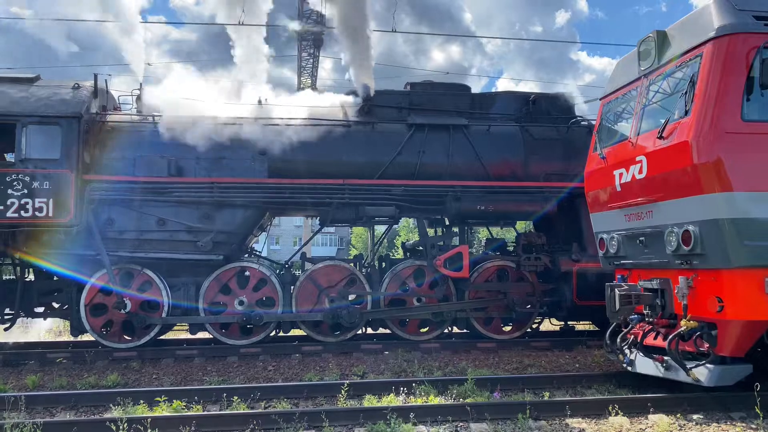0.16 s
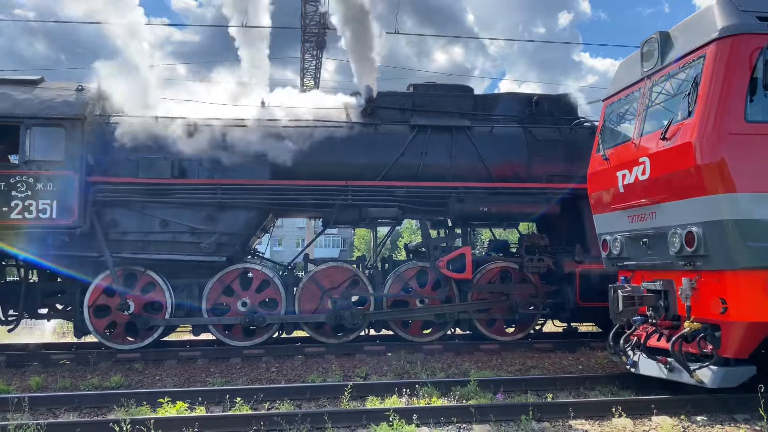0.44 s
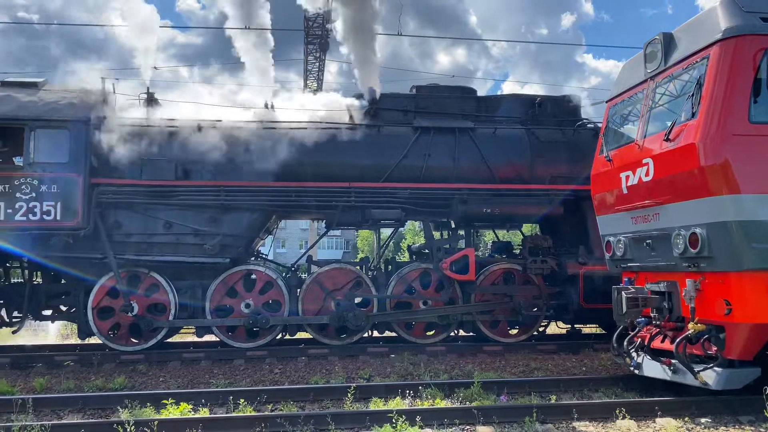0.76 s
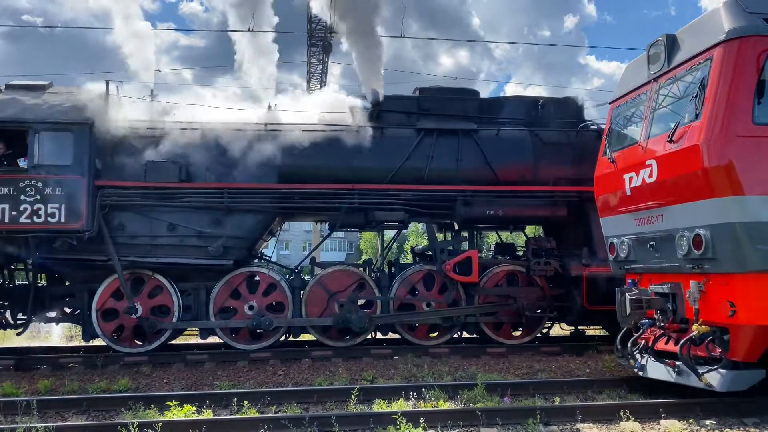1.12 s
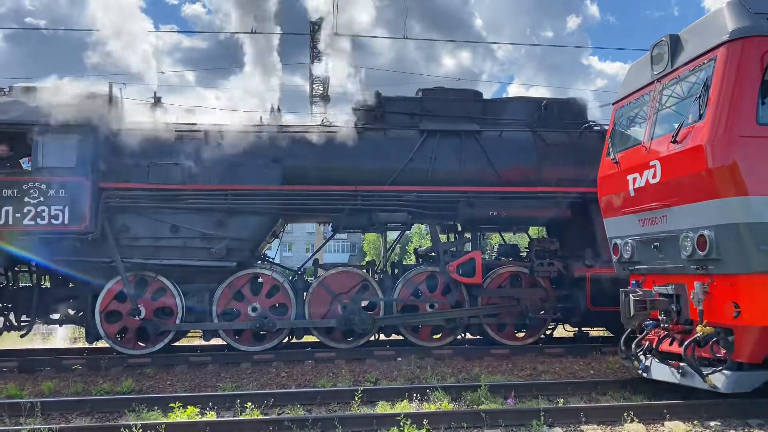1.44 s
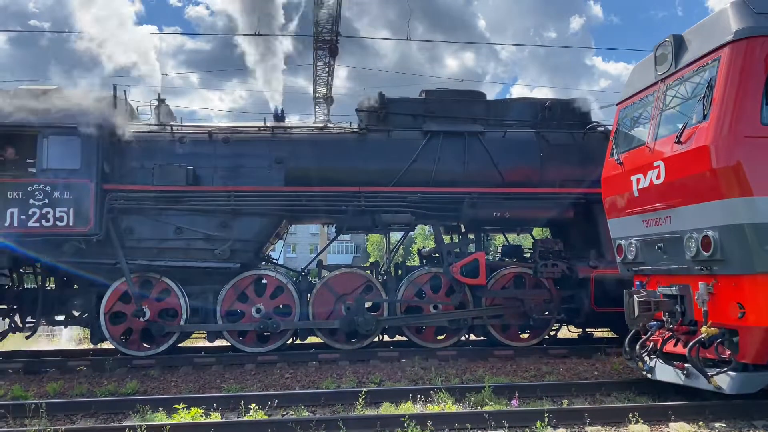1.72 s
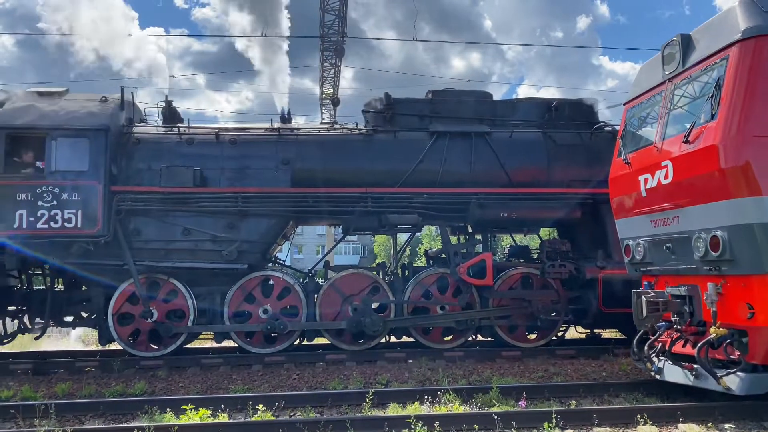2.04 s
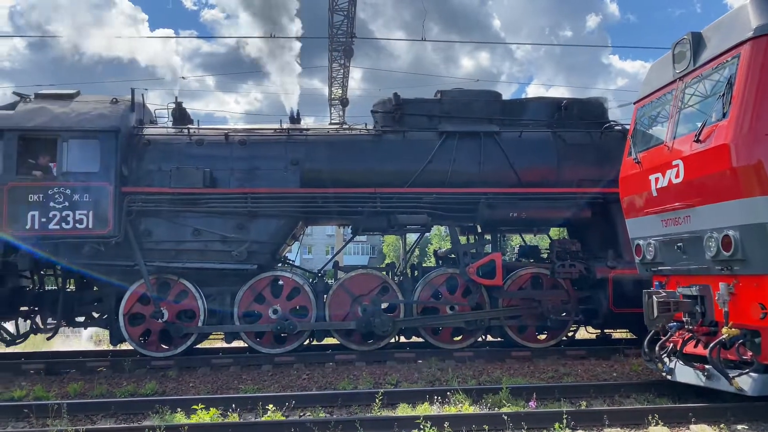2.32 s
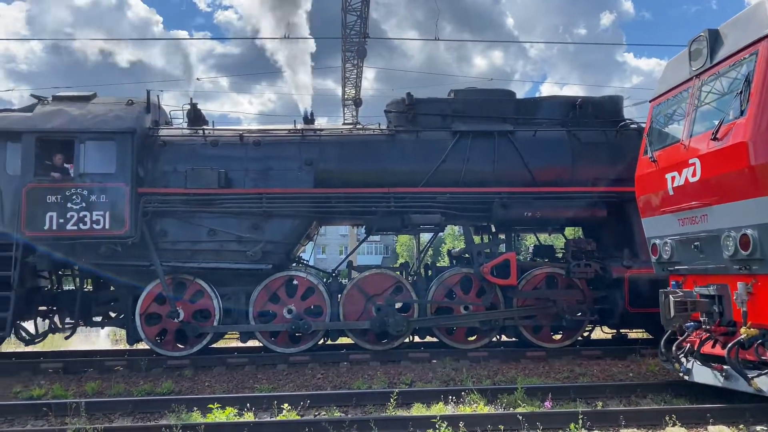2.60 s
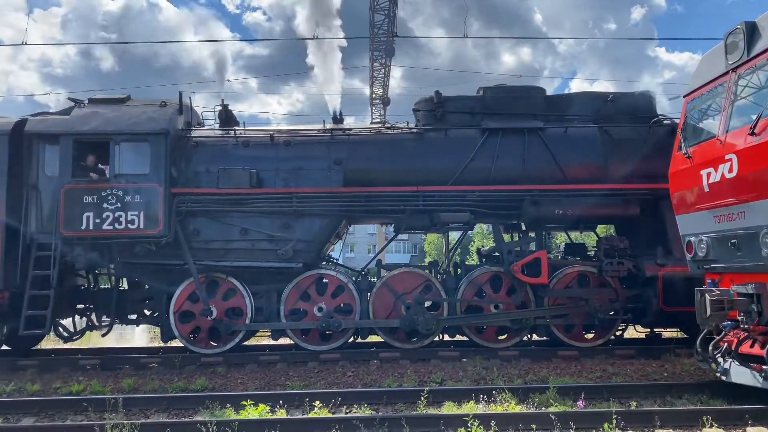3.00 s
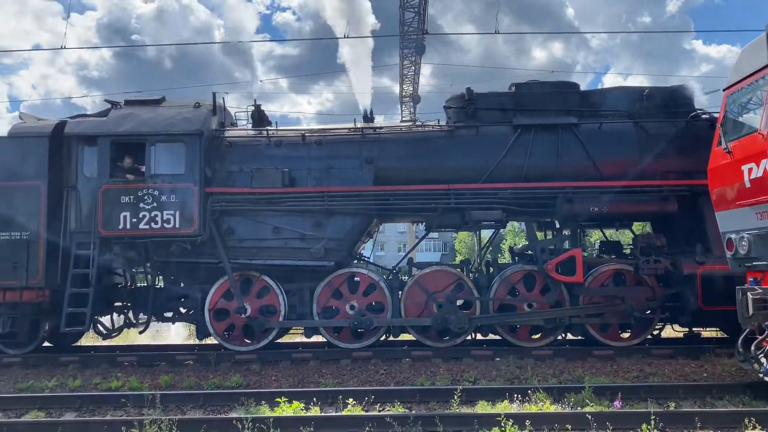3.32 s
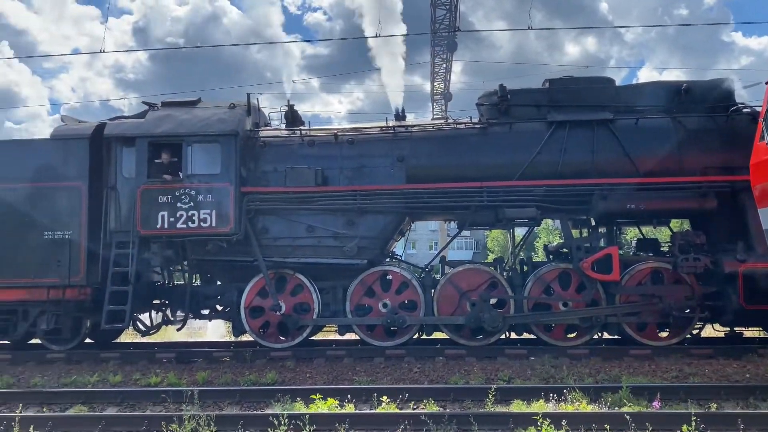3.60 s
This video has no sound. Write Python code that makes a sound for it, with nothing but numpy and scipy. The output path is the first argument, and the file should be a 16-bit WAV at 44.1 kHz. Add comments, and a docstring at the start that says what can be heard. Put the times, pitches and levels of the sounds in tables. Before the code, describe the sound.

A steam locomotive's chime whistle starts abruptly with a breathy, roaring chord, then droops and cuts off with a short yard echo. Gusty steam hiss continues over faint low machinery rumble, heard outdoors in stereo from a few tracks away.

```python
"""In a rail yard, a steam locomotive a few tracks away blows a short, breathy chord on its chime whistle.
The chord is wavering sine tones and noise tuned by the pipes, under a broad roar of noise from the jet.
As the valve shuts, the jet dies and the chord sags, its low notes swell briefly, and the yard echoes it.
A boiler vent hisses in gusts of shaped noise, above idling machinery made of low tones and rumble.
Soft, low buffets of air brush the microphones."""
import sys
import numpy as np
from scipy import signal
from scipy.fft import rfft, irfft
from scipy.io import wavfile

SR = 44100
rng = np.random.default_rng(int(sys.argv[2]) if len(sys.argv) > 2 else 0)


def inscribe(sig):
    """Save sig as 16-bit PCM at rate SR to the path in sys.argv[1].

    A 1-D sig is mono; a 2-D sig holds one channel per row.
    Samples are clipped to [-1, 1] before scaling.
    """
    pcm = np.round(np.clip(np.atleast_2d(sig).T, -1, 1) * 32767)
    wavfile.write(sys.argv[1], SR, pcm.astype(np.int16))


N = 165816

# Whistle valve over time: time_s, pitch_share (of full pitch), chord_db, low_note_swell_db, jet_db
WHISTLE_VALVE = [(.07, .995, 0.5, -1.5, 2.5), (.12, 1.002, 2.5, -2.5, 1.5), (.45, 1, -0.5, -0.5, -1.5),
                 (.62, 1.008, -0.5, -1.5, -1.5), (.7, .998, -0.5, -0.5, -1.5), (.92, 1.002, -.5, -1, 0),
                 (1.14, 1.0, 0.5, -3.5, 1), (1.22, .993, 0, -1.5, -1.5), (1.26, .975, 2.5, -1.5, -4),
                 (1.273, .935, 0, 6.5, -4.5), (1.288, .922, -1.5, 11.5, -4.5), (1.298, .89, -2.5, 6.5, -8),
                 (1.31, .84, -13, 3, -18), (1.335, 0.825, -30, 10, -33)]
# Tones of the three bells, then overtones: pitch_hz, level_db, left_minus_right_db, roughness_0_to_1, swell_share
BELL_TONES = [(447, -34.7, 0, .15, .8), (636, -27.3, -8.3, .1, 1.05), (878, -27.2, 4.7, .14, .85),
              (1274, -33, 6.6, .5, -.6), (1583, -46.5, 4, .8, 1.2), (1758, -38, 1, .62, -.2),
              (1910, -44, -1, .5, 0), (2547, -47.5, 4, .55, 0), (2636, -47.5, 8, .55, 0),
              (3185, -49, 5, .6, 0)]
# Pipe resonances that the steam only breathes through: pitch_hz, width_hz, level_db, left_minus_right_db
PIPE_BREATH = [(456, 52, -49.5, 5), (570, 130, -39.5, 0), (773, 40, -38.5, 4), (845, 80, -44, 4),
               (1000, 230, -41.5, 9), (1274, 56, -47.5, -6), (1560, 190, -42, 11.5), (1735, 27, -38.5, -3),
               (1973, 88, -40, -10), (2070, 65, -37.5, 2.5)]
# Tone colour of the jet's roar: pitch_hz, level_db_per_hz (relative)
JET_COLOUR = [(20, -7), (40, 0), (70, 6), (130, -7.5), (240, 2), (330, -5.5), (600, 2), (1150, -6),
              (2300, 0.5), (3200, 1.5), (5500, 3.1), (6500, 1.5), (8400, 4), (10300, 4.55), (12500, -2),
              (15500, -8.5)]
# Boiler vent over time: time_s, level_db, extra_treble_db
VENT_GUSTS = [(.07, -34, -6), (1.33, -34.5, 1.5), (1.41, -36, 1), (1.445, -34.5, 3.5), (1.5, -35, -2),
              (1.7, -34.5, 4.5), (1.86, -36, 2), (1.97, -34, 6), (2.1, -33.5, 0.5), (2.19, -31, 1),
              (2.31, -30, 4), (2.45, -32.5, 1.5), (2.6, -31.5, 0.5), (2.73, -32, 5.5), (2.92, -32.5, 0.5),
              (3.06, -32.5, 7), (3.17, -33, 1), (3.33, -32.5, 3), (3.48, -33.5, -0.5), (3.76, -32, 2.5)]
# Tone colour of the vent's hiss: pitch_hz, level_db_per_hz (relative)
HISS_COLOUR = [(150, -14), (350, -13), (550, -7.5), (1000, -1), (1250, -6), (1800, -2), (2300, -5),
               (3400, -1), (5500, -1.5), (7200, 0.5), (8500, 1), (10200, 2.64), (11500, -5.5),
               (15500, -9.5)]
# Steady tones of the idling machinery: pitch_hz, level_db
MACHINE_TONES = [(51.3, -59.5), (62.8, -47), (68.5, -54.5), (74.3, -52), (97, -58.5), (242, -65.5)]
# Tone colour of the machinery's rumble and the air buffets: pitch_hz, level_db_per_hz (relative)
RUMBLE_COLOUR = [(20, -22), (35, -9), (55, 4.5), (100, 7), (150, -2), (250, -15.5), (400, -15), (900, -33)]
# Rise and fall of the machinery: time_s, level_db
MACHINE_LEVEL = [(.07, -2), (1.3, 0.5), (1.7, -8.5), (2.0, 1), (2.6, 1), (2.85, -5.5), (3.25, -7),
                 (3.58, 2), (3.76, 2.5)]
# Soft low buffets of air: centre_s, level_db
AIR_BUFFETS = [(1.13, -33.5), (1.44, -49.5), (2.0, -46.5), (2.28, -44), (2.6, -50), (2.709, -39.5),
               (3.57, -43)]
# The two microphones: pitch_hz, likeness_0_to_1, left_minus_right_db, left_lead_radians
MICROPHONE_PAIR = [(60, .85, 0, 0), (250, .85, 0, 0), (440, .85, 0, .7), (640, .8, 0, .2),
                   (880, .85, .5, 2.1), (1280, .72, 1, 2.4), (1780, .7, 1, -1.2), (2300, .15, 3.7, 0),
                   (3600, .55, 4.5, .5), (5600, .58, 5, .9), (6600, .83, 3.5, 0), (7700, .73, 1.5, -1.6),
                   (8450, .98, 0, -3.1), (9100, .72, 0, -4.45), (9750, .98, 0, -6.2), (10500, .96, 0, -6.3),
                   (11100, .62, 0, -7.6), (11800, .98, 0, -9.4), (12500, .97, 0, -9.5),
                   (13050, .45, 0, -10.6), (13500, .97, 0, -12.5), (14500, .97, 0, -12.6),
                   (15300, .6, 0, -14.5)]

OPEN_S, ATTACK_S = 0.071, 0.0031   # the whole scene starts abruptly
FLUTTER_PER_S, WANDER_SHARE, WANDER_PER_S = 22, 0.00149, 8.8
SPUTTER_PER_SAG, SPUTTER_PER_S = 0.27, 120   # pitch unsteadiness as a share of the sag, and its speed
SWELL_BELOW_HZ = 1100   # for the breath; each tone has its own share of the swell
JET_DB, JET_FLICKER_DB = -24, 1.47
YARD_DB, YARD_T60_S, YARD_CUT_HZ = -21, 0.77, 4200   # T60: time for the echo to fade by 60 dB
VENT_FLICKER_DB, TREBLE_HZ = 0.99, 6900
GROUND_ECHO_S, GROUND_SHARE, GROUND_CUT_HZ = .00385, 0.59, 2100
THROB_ROUGHNESS, THROB_FLUTTER_PER_S = 0.32, 4
RUMBLE_DB, RUMBLE_FLICKER_DB = -49.5, 1.5
BUFFET_SPREAD_S, BUFFET_FLICKER_DB = 0.022, 1.0
CUTOFF_HZ = 15300


def whistle_tones(pitch, swell_db):
    """The bells ring as wavering sines whose pitch grows more unsteady as it sags."""
    chord = 0
    for hz, db, pan_db, roughness, swell_share in BELL_TONES:
        wander = WANDER_SHARE * drift(WANDER_PER_S)
        sputter = SPUTTER_PER_SAG * (1 - pitch) * drift(SPUTTER_PER_S)
        level = from_db(db + swell_share * swell_db) * panned(pan_db)
        chord = chord + level * tone(hz, pitch + wander + sputter, roughness, FLUTTER_PER_S)
    return chord


def whistle_breath(pitch, swell_db):
    """Pipe resonances pick bands out of steam noise, which bend along with the whistle's pitch."""
    air, hz = pair_noise(), bins()
    power = 0
    for centre_hz, width_hz, db, pan_db in PIPE_BREATH:
        height = (from_db(db) * panned(pan_db)) ** 2 * SR / (np.pi * width_hz)
        power = power + height / (1 + ((hz - centre_hz) / width_hz * 2) ** 2) ** 2
    low = hz < SWELL_BELOW_HZ
    read_at = np.cumsum(pitch)   # stepping through the noise more slowly lowers its pitch
    total = 0
    for band, gain in ((low, from_db(swell_db)), (~low, 1)):
        breath = irfft(air * np.sqrt(power) * band, N)
        total = total + gain * np.array([np.interp(read_at, np.arange(N), side) for side in breath])
    return total


def whistle():
    """The valve steers the chord of tones and breath, and the roar of the steam jet."""
    pitch, chord_db, swell_db, jet_db = in_time(WHISTLE_VALVE)
    chord = whistle_tones(pitch, swell_db) + whistle_breath(pitch, swell_db)
    jet = from_db(JET_DB + jet_db) * turbulence(JET_COLOUR, JET_FLICKER_DB)
    valve_open = np.arange(N) / SR < WHISTLE_VALVE[-1][0]
    return (from_db(chord_db) * chord + jet) * valve_open


def yard(x):
    """Trains and buildings around return a dull, diffuse echo: the sound smeared by fading noise."""
    t = np.arange(SR) / SR
    tail = rng.standard_normal((2, SR)) * from_db(-60 * t / YARD_T60_S)
    tail = tail * (t > .02)   # the first echo needs time to come back
    tail = tail / np.sqrt(np.sum(tail ** 2) / 2)
    dull = signal.butter(2, YARD_CUT_HZ, fs=SR, output="sos")
    tail = signal.sosfilt(dull, tail)
    return from_db(YARD_DB) * signal.fftconvolve(x, tail, axes=1)[:, :N]


def vent():
    """Escaping steam hisses in gusts, coloured by a dull ground reflection that arrives just after it."""
    level_db, treble_db = in_time(VENT_GUSTS)
    hiss, hz = rfft(turbulence(HISS_COLOUR, VENT_FLICKER_DB)), bins()
    delay = np.exp(-2j * np.pi * hz * GROUND_ECHO_S)
    dullness = np.hypot(1, hz / GROUND_CUT_HZ)
    hiss = hiss * (1 + GROUND_SHARE * delay / dullness)
    low_share = 1 / (1 + (hz / TREBLE_HZ) ** 6)
    lower = irfft(hiss * low_share, N)
    treble = irfft(hiss * (1 - low_share), N)
    return from_db(level_db) * (lower + from_db(treble_db) * treble)


def machinery():
    """Close low tones beat against each other in a bed of rumble."""
    throb = 0
    for hz, db in MACHINE_TONES:
        throb = throb + from_db(db) * tone(hz, np.ones(N), THROB_ROUGHNESS, THROB_FLUTTER_PER_S)
    rumble = from_db(RUMBLE_DB) * turbulence(RUMBLE_COLOUR, RUMBLE_FLICKER_DB)
    return from_db(in_time(MACHINE_LEVEL)[0]) * (throb + rumble)


def buffets():
    """Air brushing the microphones makes brief, smooth swells of rumble."""
    t = np.arange(N) / SR
    swells = 0
    for centre_s, db in AIR_BUFFETS:
        swells = swells + from_db(db) * np.exp(-((t - centre_s) / BUFFET_SPREAD_S) ** 2 / 2)
    return swells * turbulence(RUMBLE_COLOUR, BUFFET_FLICKER_DB)


def tone(hz, pitch, roughness, flutter_per_s):
    """A stereo sine, part steady and part fluttering in strength and phase; average rms 1."""
    roughness = np.clip(roughness, 0, 1)
    steady = np.sqrt(2 * (1 - roughness ** 2))
    flutter = roughness * (drift(flutter_per_s) + 1j * drift(flutter_per_s))
    phase = 2 * np.pi * (np.cumsum(hz * pitch) / SR + rng.random())
    left_lead = at_hz(MICROPHONE_PAIR, hz)[2]
    side_phase = np.exp(.5j * left_lead * np.array([[1], [-1]]))
    return np.real((steady + flutter) * np.exp(1j * phase) * side_phase)


def turbulence(colour, flicker_db, count=10):
    """Coloured stereo noise whose octave bands flicker, partly together; rms 1."""
    noise = pair_noise() * from_db(at_hz(colour, bins())[0])
    octave = np.log2(bins() / (SR / 2))
    together, total = drift(4.6), 0
    for k in range(count):
        overlap = np.maximum(1 - abs(octave + k), 0)   # neighbouring bands crossfade
        band = irfft(noise * overlap, N)
        flicker = (together + drift(11.7)) / np.sqrt(2)
        total = total + band * from_db(flicker_db * flicker)
    return rms_one(total)


def pair_noise():
    """Spectrum of noise as two microphones hear it: partly alike, with level and phase differences."""
    alike, pan_db, left_lead = at_hz(MICROPHONE_PAIR, bins())
    alike = np.clip(alike, 0, .99)
    mid, side = rfft(rng.standard_normal((2, N)))
    signs = np.array([[1], [-1]])   # left, right
    noise = np.sqrt(1 + alike) * mid + signs * np.sqrt(1 - alike) * side
    return noise * np.exp(.5j * signs * left_lead) * panned(pan_db)


def drift(rate_per_s):
    """Smoothed random wandering with spread 1, worked out at every 40th sample and joined by lines."""
    r = np.exp(-80 * np.pi * abs(rate_per_s) / SR)
    raw = rng.standard_normal(N // 40 + 2002)
    slow = signal.lfilter([1], [1, -2 * r, r * r], raw)[2000:]   # drop the filter's start-up
    return np.interp(np.arange(N) / 40, np.arange(len(slow)), rms_one(slow))


def in_time(rows):
    """Each column of a curve, at every sample."""
    s, *columns = np.transpose(rows)
    return [np.interp(np.arange(N) / SR, s, c) for c in columns]


def at_hz(rows, hz):
    """Each column of a spectrum, at the given frequencies."""
    f, *columns = np.transpose(rows)
    return [np.interp(np.log(hz), np.log(f), c) for c in columns]


def bins():
    """Frequency of each spectrum step in Hz, kept at 1 or more so that logarithms work."""
    return np.maximum(np.arange(N // 2 + 1) * SR / N, 1)


def panned(db):
    """Left and right gains that differ by the given dB."""
    return from_db(np.array([db, -db]).reshape(2, -1) / 2)


def from_db(db):
    """Turn decibels into a gain."""
    return 10 ** (np.asarray(db) / 20)


def rms_one(x):
    """Scale a signal to an rms level of 1."""
    return x / np.sqrt(np.mean(x ** 2) + 1e-20)


def scene():
    """Whistle with its yard echo, vent, machinery and air buffets."""
    started = np.clip((np.arange(N) / SR - OPEN_S) / ATTACK_S, 0, 1)
    blast = started * whistle()
    return blast + yard(blast) + started * (vent() + machinery() + buffets())


def record(dry):
    """A steep low-pass filter removes the very top of the treble."""
    steep = signal.ellip(10, .1, 80, CUTOFF_HZ, fs=SR, output="sos")
    return signal.sosfilt(steep, dry)


dry = scene()
out = record(dry)
inscribe(out)
```